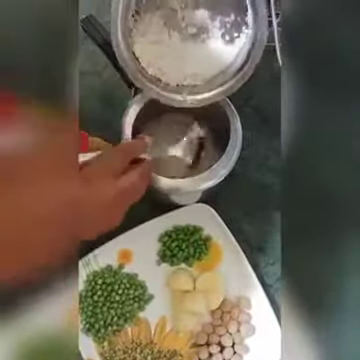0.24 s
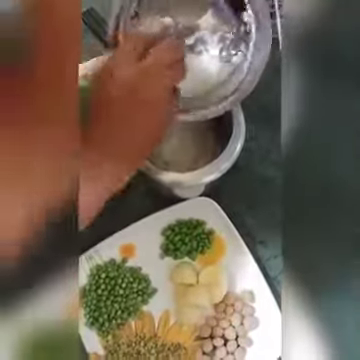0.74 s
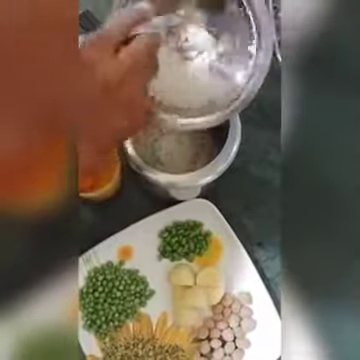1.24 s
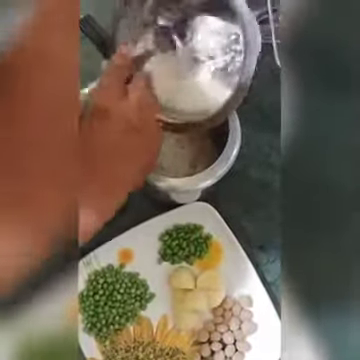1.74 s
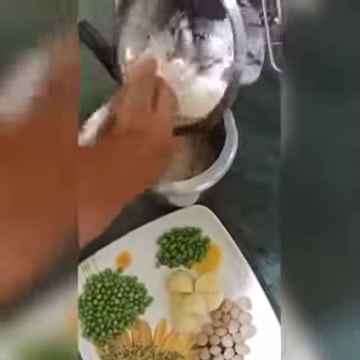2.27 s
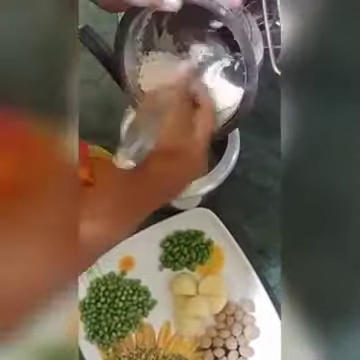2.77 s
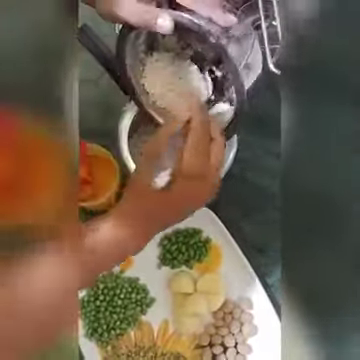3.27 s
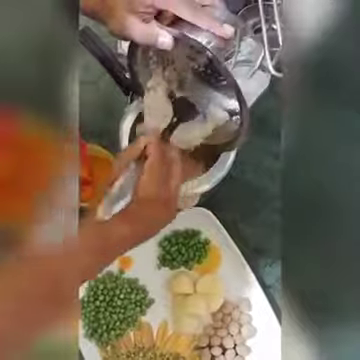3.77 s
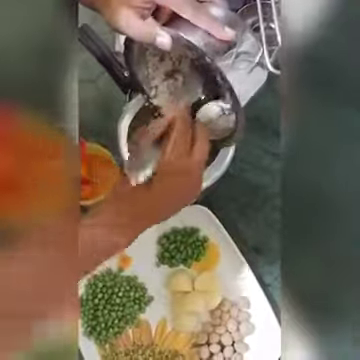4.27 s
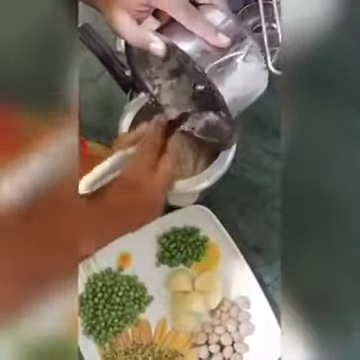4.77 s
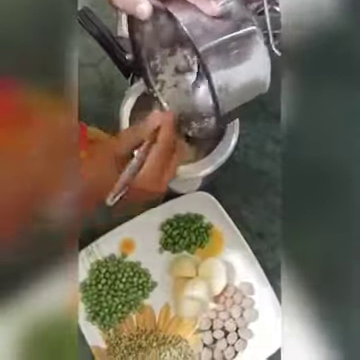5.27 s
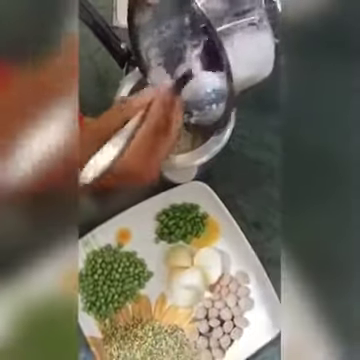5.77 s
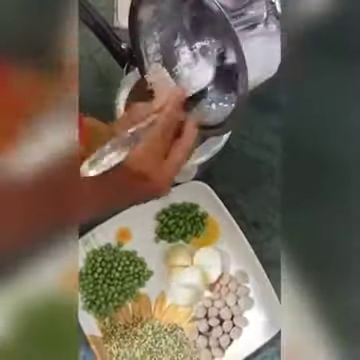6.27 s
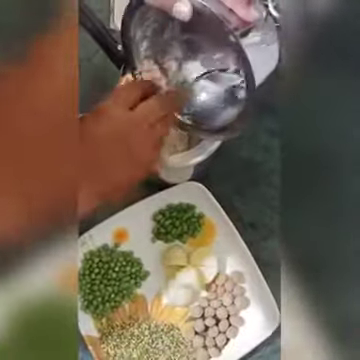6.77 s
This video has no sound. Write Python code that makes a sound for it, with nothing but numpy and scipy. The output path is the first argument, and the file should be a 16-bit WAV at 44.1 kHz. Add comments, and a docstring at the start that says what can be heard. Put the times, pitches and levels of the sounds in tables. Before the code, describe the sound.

Close, irregular steel clinks mix with brief rasps and hisses of raw rice being scraped from a bowl into a pot.

```python
"""Short steel knocks and clicks with hissing, rasping rice between them, close by in a small kitchen.
A steel spoon scrapes raw rice from a hand-held metal bowl into a pressure cooker: it knocks on the
bowl, then grains slide along the wall and drop into the pot. Hand and rice damp the steel, so each
blow rings only briefly; hard walls answer."""
import sys
import numpy as np
from scipy import signal
from scipy.fft import rfft, irfft, next_fast_len
from scipy.io import wavfile

SR = 44100
rng = np.random.default_rng(int(sys.argv[2]) if len(sys.argv) > 2 else 0)


def digitize_waveform(pressure):
    """Quantize a signal to 16-bit integers and store it at the path in sys.argv[1].

    Rows of a 2-D input are taken as channels; values are limited to [-1, 1].
    """
    field = np.atleast_2d(pressure).T
    bounded = np.clip(field, -1, 1)
    quanta = np.round(bounded * 32767).astype(np.int16)
    wavfile.write(sys.argv[1], SR, quanta)


N = 309141


def amp(db):
    """dB to gain."""
    return 10 ** (np.asarray(db) / 20)


def unit(x, size=None):
    """Scale to rms 1 over the first size samples."""
    return x / np.sqrt(np.mean(x[..., :size] ** 2) + 1e-20)


def along(points, hz):
    """Read (f/Hz, value) points on a log frequency axis."""
    f, v = np.transpose(points)
    return np.interp(np.log(hz + 1), np.log(f), v)


def filtered(x, response):
    """Apply a frequency response."""
    n = x.shape[-1]
    m = next_fast_len(n + 4096, real=True)
    return irfft(rfft(x, m) * response(np.fft.rfftfreq(m, 1 / SR)), m)[..., :n]


def convolved(x, h):
    """x through impulse response h, cut to the length of x."""
    return signal.fftconvolve(np.atleast_2d(x), np.atleast_2d(h), axes=1)[:, :x.shape[-1]]


def body(colour, size=2048):
    """Minimum-phase impulse response of a colour, rolled off at its last point."""
    hz = np.fft.rfftfreq(size, 1 / SR)
    gain = amp(along(colour, hz)) / (1 + (hz / colour[-1][0]) ** 4)
    cepstrum = irfft(np.log(gain + 1e-6))
    cepstrum[1:size // 2] *= 2
    cepstrum[size // 2 + 1:] = 0
    return irfft(np.exp(rfft(cepstrum)))


def flutter(size, rate_hz):
    """Random curve, rms about 1, with knots at rate_hz."""
    knots = rng.standard_normal(size // 20 + 2)
    return np.interp(np.arange(size) * rate_hz / SR, np.arange(len(knots)), knots)


def room_tone():
    """Faint steady air of the kitchen."""
    air_colour = [(25, -11), (60, 5.5), (140, -2.5), (300, -6.5), (700, -10), (1500, -17.5), (4000, -23),
                  (6800, -28), (8000, -23.5), (10000, -38.5), (15000, -30)]  # f/Hz, level/dB
    shared, own = rng.standard_normal(N), rng.standard_normal((2, N))
    return amp(-57.0) * unit(filtered(shared + 1.2 * own, lambda hz: amp(along(air_colour, hz))))


def kitchen(wet_db):
    """Stereo response: direct sound, then dense echoes off the counter and walls."""
    coherence = [(60, .6), (150, .88), (300, .9), (550, .55), (1000, .35), (3000, .2), (8000, .3),
                 (14000, .15)]  # echoes: f/Hz, left-right correlation
    decay = [(100, 0.29), (500, 0.17), (1500, 0.2), (5000, 0.15), (8000, 0.11), (14000, 0.14)]  # echoes: f/Hz, t60/s
    hz, t, noise = signal.stft(rng.standard_normal((2, SR // 3)), SR, nperseg=256)
    mix_rad = np.arccos(np.clip(along(coherence, hz), 0, 1))[:, None] / 2
    echoes = np.array([np.cos(mix_rad) * noise[0] + side * np.sin(mix_rad) * noise[1]
                       for side in (1, -1)])
    response = signal.istft(echoes * amp(-60 * t / along(decay, hz)[:, None]), SR, nperseg=256)[1]
    response *= amp(wet_db) / np.linalg.norm(response[0])
    response[:, 0] += 1
    response[1] = np.roll(response[1], rng.integers(9))  # extra path to the right, new at each spot
    return response


def hollow(strength, count=8):
    """Reflections inside the bowl, within 4 ms, comb the spectrum anew at each spot."""
    h = np.zeros(SR // 250)
    h[rng.integers(SR // 4000, len(h), count)] = strength * rng.choice([-1, 1], count)
    h[0] = 1
    return h / np.linalg.norm(h)


def steel(t, focus_hz, width_oct, scatter_db=2.5):
    """The spot struck decides which modes ring: those near focus_hz, each at a new strength."""
    modes = [(308, 4, 0.16), (369, 8, 0.067), (471.6, -2, 0.14), (515.8, 7, 0.098), (579, -2, 0.12),
             (636.2, 2, 0.15), (704, -2.5, 0.14), (746, 2.5, 0.11), (828, -4, 0.11), (1098, 7.5, 0.076),
             (1182.4, 4.5, 0.17), (1527, 2.5, 0.12), (1466, 2, 0.1), (1750, -12, 0.062), (1827, 5, 0.023),
             (2118, 9, 0.073), (3050, 12.5, 0.12), (3284, 13.5, 0.1), (3663, 2, 0.081), (4320, -2, 0.087),
             (4980, 7.5, 0.06), (5430, -5.5, 0.097), (5830, -11, .16), (5760, 0.5, 0.043),
             (6170, 5.5, 0.066), (7080, -0.5, 0.16), (7840, 9, 0.04), (7930, 4, 0.21), (7360, -8, .13),
             (8160, 5, 0.17)]  # bowl, pot and spoon: f/Hz, level/dB, t60/s
    hz, db, t60_s = np.transpose(modes)[:, :, None]
    weight = amp(db + scatter_db * rng.standard_normal(hz.shape))
    weight /= 1 + (np.log2(hz / focus_hz) / width_oct) ** 2
    phase = rng.uniform(0, 2 * np.pi, hz.shape)
    return np.sum(weight * amp(-60 * t / t60_s) * np.sin(2 * np.pi * hz * t + phase), axis=0)


def grains(size, rate_hz, spread):
    """Tiny random impacts of uneven, bounded strength."""
    hit = rng.random(size) < rate_hz / SR
    return hit * rng.uniform(-0.91, 1, size) * np.exp(spread * np.tanh(rng.standard_normal(size)))


def stroke(start_s, length_s, swell_db, rise_db_per_s, fall_db_per_s):
    """Gain of one push: builds up, swells or eases while the hand moves, runs out."""
    t = np.arange(N) / SR - start_s
    progress = np.clip(t / max(length_s, .005), 0, 1)
    edges_db = rise_db_per_s * np.minimum(t, 0) - fall_db_per_s * np.maximum(t - length_s, 0)
    return amp(swell_db * (progress - .5) + edges_db)


def stream(flow, colour, focus_hz, width_oct, ring_db, rate_hz, spread, slip_db, wet_db):
    """Grains stick and slip in small avalanches and ring the steel; echoes shift as the bowl moves."""
    slips = amp(slip_db * np.tanh(flutter(N, rate_hz=400)))
    impacts = unit(grains(N, rate_hz, spread) * slips) * flow
    wall = body(colour)
    step = SR // 6
    t = np.arange(step) / SR
    out = np.zeros((2, N + SR))
    for start in range(0, N, step):
        ring = steel(t, focus_hz, width_oct)
        response = amp(ring_db) * ring / np.linalg.norm(ring)
        response[:len(wall)] += wall / np.linalg.norm(wall)
        response = convolved(kitchen(wet_db), convolved(response, hollow(strength=0.25)))
        response /= np.linalg.norm(response[0])
        part = signal.fftconvolve(impacts[None, start:start + step], response, axes=1)
        out[:, start:start + part.shape[1]] += part
    return out[:, :N]


def rice():
    """Sliding grains hiss on the steel; the spoon grinds and rasps through them; the vessels rumble."""
    # rice pushed along the wall and over the lip: t/s, length/s, hiss/dB, swell/dB
    spills = [(0.261, 0.021, -38, -4), (0.328, 0.018, -34.5, 3), (0.688, 0.074, -52.5, -7),
              (0.815, 0.068, -44, 15), (0.898, 0.068, -27, 3), (1.592, 0.17, -25.5, 6),
              (2.066, 0.18, -35.5, 4.5), (2.346, 0.026, -50.5, 0), (2.458, .14, -34, 7),
              (2.887, 0.12, -29.5, 11), (2.962, 0.063, -23.5, -4), (3.17, 0.045, -49.5, 2),
              (3.283, 0.11, -35.5, 11), (3.893, 0.15, -49, 17), (4.028, 0.15, -34, 3.5),
              (4.182, 0.16, -37.5, 2.5), (4.515, 0.086, -31.5, -5), (4.963, .06, -30.5, -6),
              (5.477, 0.072, -38.5, 1), (5.524, 0.053, -29, -6), (5.893, 0.11, -28, -5),
              (6.236, 0.15, -30.5, 17.5), (6.63, 0.17, -35, 8)]
    # spoon dragged through rice on steel: t/s, length/s, grit/dB, rasp/dB, rumble/dB, swell/dB
    scrapes = [(0.005, 0.014, -68, -50.5, -50, -12), (0.263, 0.017, -38.5, -68, -81, -8),
               (2.103, 0.16, -40, -38.5, -39.5, -9.5), (2.568, 0.068, -37.5, -65, -46, -11),
               (3.31, 0.11, -35, -49, -48, 8), (3.585, 0.1, -48.5, -43, -40.5, -8),
               (3.73, 0.15, -71.5, -70, -54.5, 2), (3.909, .14, -50, -60, -62, 0),
               (4.191, 0.15, -38.5, -44, -37.5, -8), (4.477, 0.077, -70, -71, -50, -15),
               (4.618, 0.088, -41, -41.5, -35, -1), (4.827, .17, -35, -32, -39, 2),
               (5.079, 0.11, -34, -36.5, -55.5, -11), (5.228, 0.074, -33, -50, -48.5, 7.5),
               (5.413, 0.096, -48.5, -49.5, -59, 9), (5.59, 0.035, -50, -44, -49, 11),
               (5.662, 0.13, -79, -81, -45.5, -15), (5.878, 0.01, -52, -38.5, -47.5, -19),
               (6.017, 0.016, -52, -31, -28, -11), (6.109, 0.18, -62, -60, -53, 20),
               (6.285, .1, -38, -37, -34.5, -3), (6.46, 0.088, -44.5, -49, -50, 4),
               (6.592, 0.13, -37, -30, -29, -3.5), (6.798, 0.11, -42, -42, -48, 18)]
    # colours of the four layers: f/Hz, level/dB
    hiss_colour = [(1500, -33.5), (3200, -12.5), (4700, -9), (5500, -2), (7000, -7.5), (8000, 8),
                   (8500, -1.5), (9100, -6), (10500, -18.5), (12600, -8.5), (13300, -7.5), (15000, -6)]
    rasp_colour = [(600, -4), (1000, 5.5), (1250, 8), (1550, 10.5), (2200, 9.5), (3400, 12.5), (4300, 6),
                   (5500, -11.5)]
    rumble_colour = [(30, -44), (80, -12.5), (150, 1), (230, -3.5), (305, -11), (400, 1.5), (520, -2.5),
                     (760, 6.5), (1050, -5), (1600, -19.5)]
    grit_colour = [(2800, -17), (3300, -5), (4000, -15), (4800, -2), (5600, 2.5), (6300, 0), (6950, -10),
                   (7900, 8.5), (8600, -0.5), (10200, -28), (15000, -8)]
    sliding, crushing, dragging, pressing = np.full((4, N), 1e-6)
    for start_s, length_s, hiss_db, swell_db in spills:
        push = stroke(start_s, length_s, swell_db, rise_db_per_s=661, fall_db_per_s=420)
        sliding = np.maximum(sliding, amp(hiss_db) * push)
    for start_s, length_s, grit_db, rasp_db, rumble_db, swell_db in scrapes:
        push = stroke(start_s, length_s, swell_db, rise_db_per_s=805.5, fall_db_per_s=240)
        crushing += amp(grit_db) * push
        dragging += amp(rasp_db) * push
        pressing += amp(rumble_db) * push
    # sliding rice also stirs the steel
    dragging = np.hypot(dragging, amp(-19.5) * sliding)
    pressing = np.hypot(pressing, amp(-23.5) * sliding)
    hiss = stream(sliding, hiss_colour, focus_hz=7900, width_oct=0.17, ring_db=-26,
                  rate_hz=4000, spread=0.24, slip_db=6.5, wet_db=4.5)
    rasp = stream(dragging, rasp_colour, focus_hz=1800, width_oct=1.0, ring_db=-10.0,
                  rate_hz=2500, spread=0.99, slip_db=7, wet_db=1.0)
    rumble = stream(pressing, rumble_colour, focus_hz=303, width_oct=0.98, ring_db=-4.5,
                    rate_hz=1200, spread=0.53, slip_db=3, wet_db=14)
    grit = stream(crushing, grit_colour, focus_hz=5840, width_oct=0.37, ring_db=-14,
                  rate_hz=1200, spread=0.31, slip_db=13, wet_db=-2.5)
    return hiss + grit + rasp + rumble


def chatter(t, fall_s):
    """One impact, then a crunch of grains falling 30 dB in fall_s, echoed by bowl and kitchen."""
    contact = grains(len(t), rate_hz=2500, spread=0.55) * amp(-30 * t / max(fall_s, .002))
    contact *= 0.99 / (np.linalg.norm(contact) + 1e-9)
    contact[0] += 1
    return convolved(convolved(contact, hollow(strength=0.35)), kitchen(wet_db=7.0))


def spoon():
    """Each blow drives the damped walls (thud, clank, snap) and clearer modes (tone, rim, ping)."""
    # spoon on bowl: t/s, knock/dB, knock/Hz, clank/dB, rim/dB, rim/Hz, click/dB, ping/Hz, chatter/s
    blows = [(0.71, -41.5, 670, -47.5, -66, 1770, -64, 5300, 0.06),
             (0.762, -18.5, 880, -25, -37, 3330, -17.5, 5670, 0.011),
             (0.886, -27, 717, -22.5, -41, 3200, -16, 5700, 0.0041),
             (1.098, -68, 496, -64, -62, 3270, -56, 4960, 0.056),
             (1.16, -51, 495, -57.5, -58, 3260, -58, 8350, 0.044),
             (1.251, -35.5, 500, -27, -29.5, 3600, -17, 5960, 0.06),
             (1.292, -13, 508, -23, -24, 3770, -13.5, 5630, 0.024),
             (1.494, -43, 700, -54.5, -57, 3350, -45.5, 8000, 0.011),
             (1.542, -11.5, 740, -23.5, -43, 1090, -18, 8400, 0.0097),
             (1.978, -32.5, 475, -31.5, -37, 3500, -21.5, 6040, 0.09),
             (2.034, -24.5, 703, -19, -56, 1030, -17.5, 5860, 0.061),
             (2.056, -22.5, 665, -18, -54, 1060, -21.5, 5470, 0.12),
             (2.452, -29, 540, -29, -32, 1000, -21.5, 6170, 0.024),
             (2.861, -22, 671, -29.5, -20, 1904, -26.5, 7450, 0.019),
             (3.216, -22.5, 563, -20.5, -21.5, 3270, -12.5, 5570, 0.15),
             (3.228, -18, 530, -42, -18, 3300, -23.5, 5400, 0.065),
             (3.51, -36, 400, -33.5, -26, 1700, -34.5, 5560, 0.045),
             (3.589, -37.5, 776, -39.5, -35.5, 1130, -60, 4940, .076),
             (3.883, -30, 333, -56, -52.5, 1120, -47, 5300, 0.072),
             (4.114, -24.5, 590, -27.5, -21.5, 3180, -17, 7740, 0.0067),
             (4.126, -21.5, 518, -26.5, -32, 3270, -24.5, 7830, 0.034),
             (4.480, -60, 510, -53, -73, 3280, -43, 7780, 0.035),
             (4.617, -44, 510, -34.5, -48, 1060, -50, 7900, 0.028),
             (4.778, -21, 547, -26, -24.5, 3150, -13, 5650, 0.03),
             (4.876, -23.5, 860, -28.5, -25.5, 1130, -42, 5700, 0.023),
             (4.927, -25.5, 514, -21, -19.5, 3270, -14.5, 5600, 0.035),
             (5.007, -37, 608, -25, -31, 3350, -20, 4900, 0.1),
             (5.177, -25, 390, -20.5, -54, 1210, -21.5, 7700, 0.0072),
             (5.185, -24, 387, -25, -20.5, 1295, -12.5, 7300, 0.071),
             (5.291, -35.5, 705, -31.5, -29, 1450, -34, 7900, 0.018),
             (5.592, -38.5, 846, -39, -35, 3520, -25.5, 7600, 0.0067),
             (5.649, -31, 487, -39.5, -48, 1560, -39, 7700, 0.0064),
             (5.857, -25, 683, -37, -44, 1450, -25, 6200, 0.011),
             (5.980, -69, 490, -52, -25, 7950, -22, 7460, .008),
             (6.008, -30.5, 470, -29, -31, 4400, -30, 6070, .04),
             (6.226, -17.5, 300, -27.5, -29.5, 1710, -35.5, 5100, .03),
             (6.245, -18.5, 706, -18, -40, 1780, -21, 4740, 0.11),
             (6.545, -22.5, 436, -19, -13, 3330, -12, 8430, 0.05),
             (6.643, -19, 329.5, -22, -36, 1560, -18, 5170, 0.052),
             (6.657, -20.5, 710, -26, -24.5, 1365, -26.5, 5110, 0.033),
             (6.788, -34.5, 363, -35.5, -33, 1700, -31, 5440, 0.028),
             (6.902, -32.5, 610, -21.5, -16, 1688, -15, 5200, 0.0038)]
    # contact colours: f/Hz, level/dB
    thud_colour = [(30, -30), (70, -24), (150, -8.5), (230, -15.5), (320, -1.5), (420, -5.5), (550, 2),
                   (800, -5.5), (1050, -18), (1600, -34.5)]
    clank_colour = [(600, -29), (1100, 5.5), (1300, -5), (1550, 6), (2100, 0), (2700, 6), (3300, 4.5),
                    (4200, 1.5), (5200, -39)]
    snap_colour = [(2800, -84), (4300, -2.5), (4750, -3.5), (5300, 3.5), (6200, 2.5), (6950, -8),
                   (7700, 7.5), (8500, 2), (9300, -6.5), (10200, -14.5), (11700, -10), (14500, -7)]
    crack_colour = [(2000, -13), (6000, 0.5), (8500, 5), (10500, -14), (15000, -1.5)]
    firm_knock_db = -21.5  # above this the tone gains on the thud
    t = np.arange(int(.3 * SR)) / SR
    attack = int(.03 * SR)
    walls = [body(colour) for colour in (thud_colour, clank_colour, snap_colour)]
    bare_steel = body(crack_colour)
    out = np.zeros((2, N + len(t)))
    for start_s, knock_db, knock_hz, clank_db, rim_db, rim_hz, click_db, ping_hz, chatter_s in blows:
        tonal_db = 0.2048 * np.clip(knock_db - firm_knock_db, -10, 10)
        thud_db, tone_db = knock_db - 3.5 - tonal_db, knock_db - 2 + tonal_db
        snap_db, ping_db = click_db - 1.5, (click_db + rim_db) / 2 - 2.5
        contact = chatter(t, chatter_s)
        blow = sum(amp(db) * unit(convolved(contact, wall), attack)
                   for db, wall in zip((thud_db, clank_db, snap_db), walls))
        echoes = kitchen(wet_db=-5.0)
        rings = ((tone_db, knock_hz, .09, .25, 140),  # vessels
                 (rim_db, rim_hz, .07, .2, 300),  # bowl rim
                 (ping_db, ping_hz, .06, .9, 600))  # spoon
        for db, hz, width_oct, roughness, rattle_hz in rings:
            ring = steel(t, hz, width_oct)
            ring *= 1 + roughness * flutter(len(t), rattle_hz)  # grains rattle on the wall
            blow += amp(db) * unit(convolved(ring, echoes), attack)
        # trapped grains cushion the onset, longer as the knock outweighs the click
        rise_s = 0.0021 * amp(0.24 * np.clip(knock_db - click_db, 0, 20))
        blow *= 1 - np.exp(-t / rise_s)
        crack = convolved(rng.standard_normal((2, len(t))) * amp(-60 * t / 0.009), bare_steel)
        blow += amp(click_db - 12) * unit(crack, attack)
        start = round(start_s * SR)
        out[:, start:start + len(t)] += blow
    return out[:, :N]


def scene():
    """Spoon, rice and room air, in stereo."""
    return spoon() + rice() + room_tone()


def record(dry):
    """Phone: left port nearer and brighter, peaks rounded, band limited. The scene carries no deep bass."""
    left_over_right = [(100, 2), (400, 4), (1200, 4.5), (2200, 2), (4400, 0.2), (6500, 1), (7900, 11.5),
                       (9000, 9.5), (14000, 11)]  # port balance: f/Hz, level/dB
    right_lag_ms, low_hz, top_hz = .11, 42, 15100

    def ports(hz):
        ratio = amp(along(left_over_right, hz))
        delay = np.exp(-2j * np.pi * hz * right_lag_ms / 1000)
        bass_cut = (1j * hz / (low_hz + 1j * hz)) ** 2
        return bass_cut * np.array([ratio, delay]) * np.sqrt(2 / (1 + ratio ** 2))

    heard = filtered(dry, ports)
    rounded = heard / (1 + np.abs(heard) ** 6) ** (1 / 6)
    return filtered(rounded, lambda hz: 1 / (1 + (hz / top_hz) ** 300))


dry = scene()
out = record(dry)
digitize_waveform(out)
```